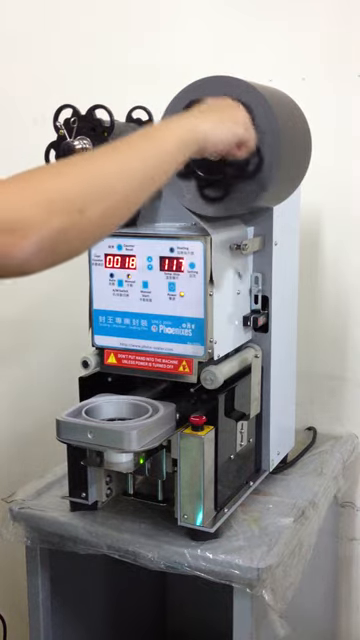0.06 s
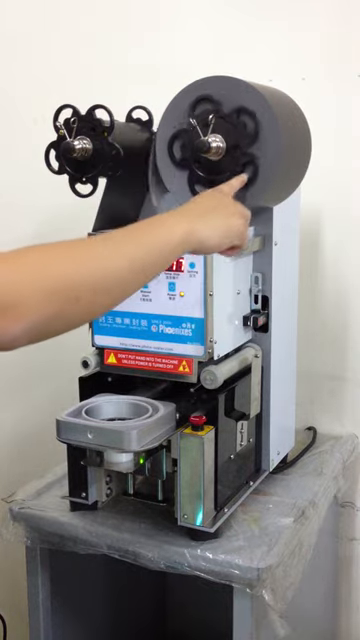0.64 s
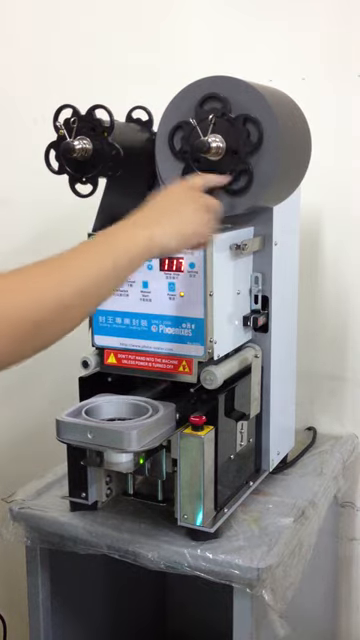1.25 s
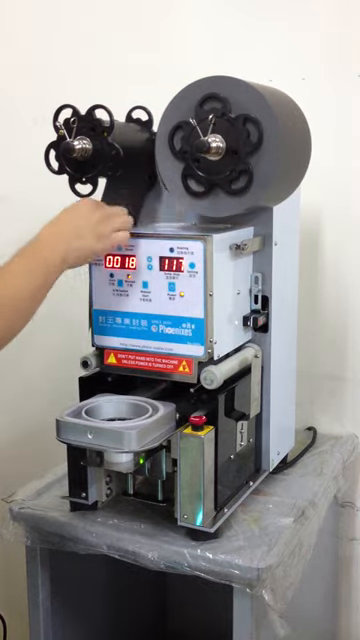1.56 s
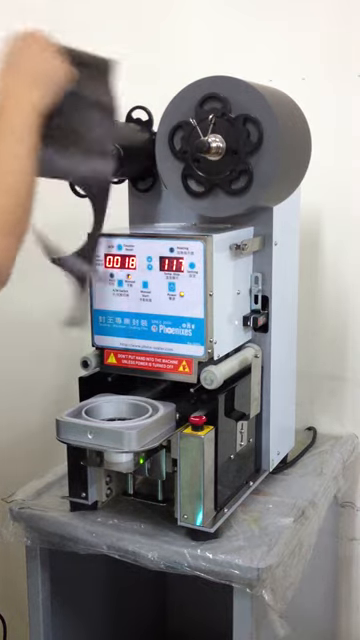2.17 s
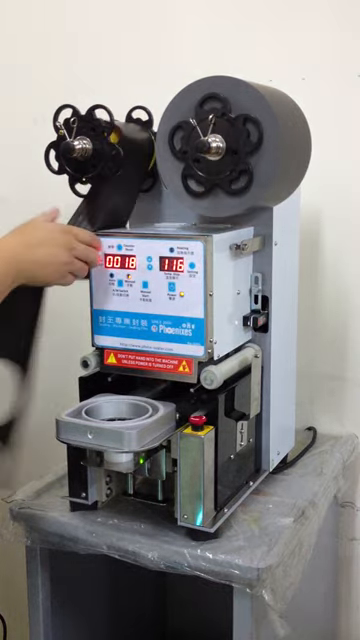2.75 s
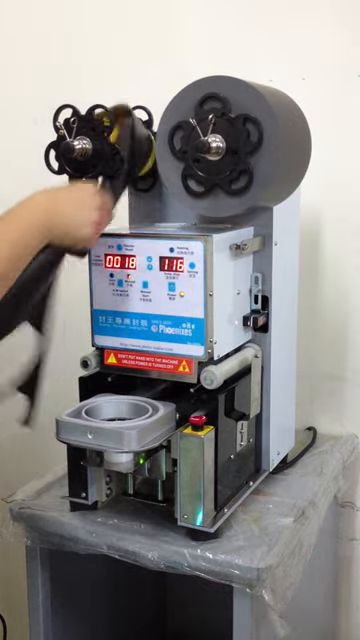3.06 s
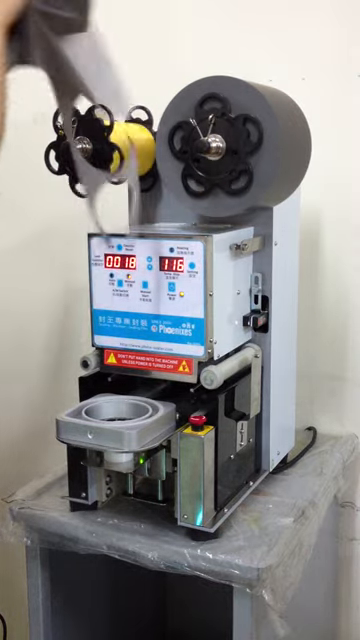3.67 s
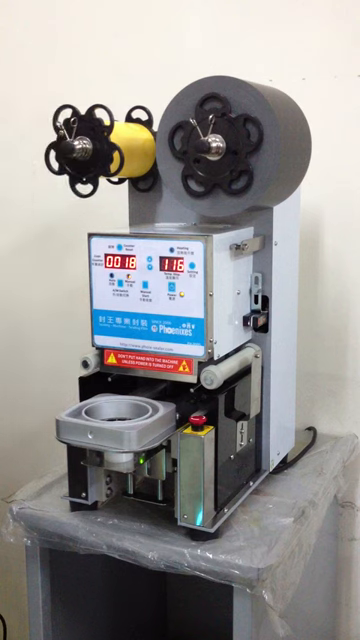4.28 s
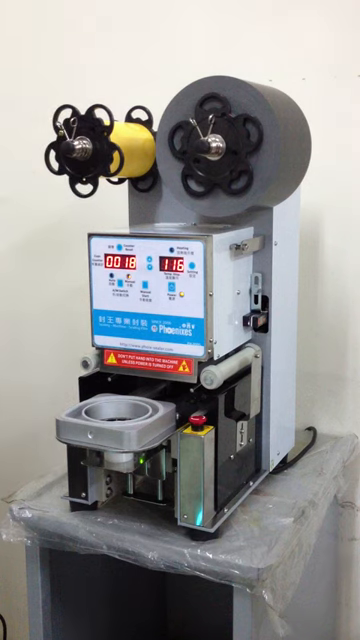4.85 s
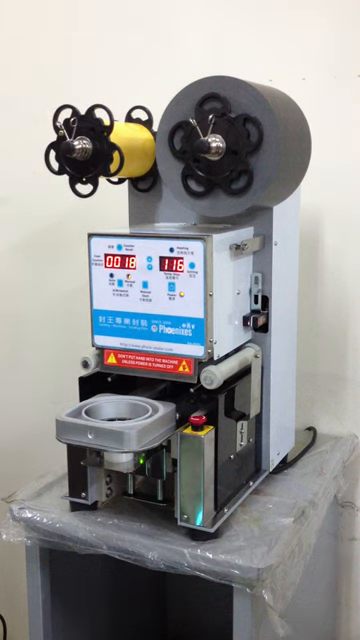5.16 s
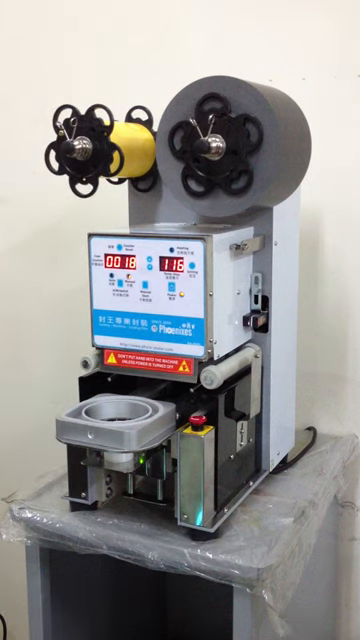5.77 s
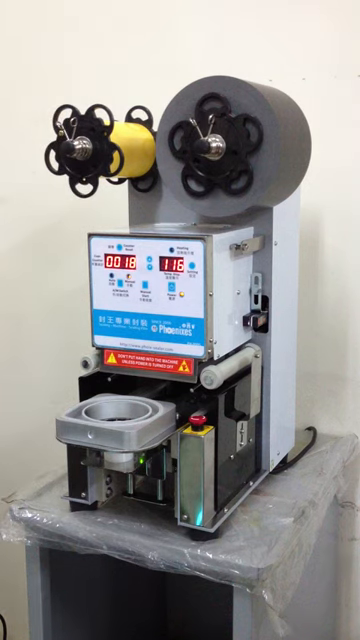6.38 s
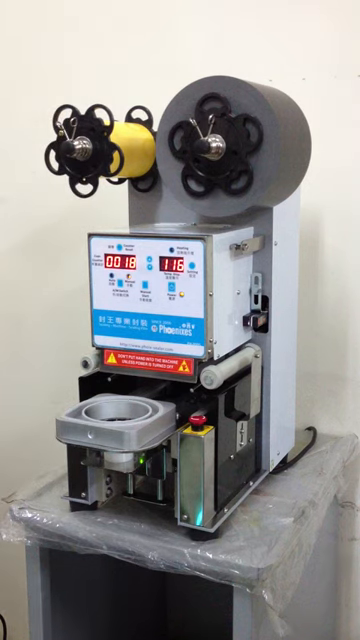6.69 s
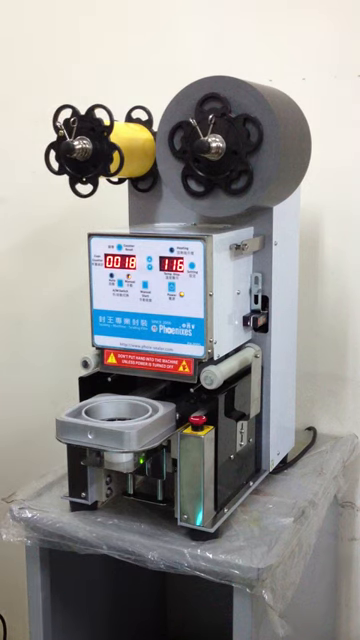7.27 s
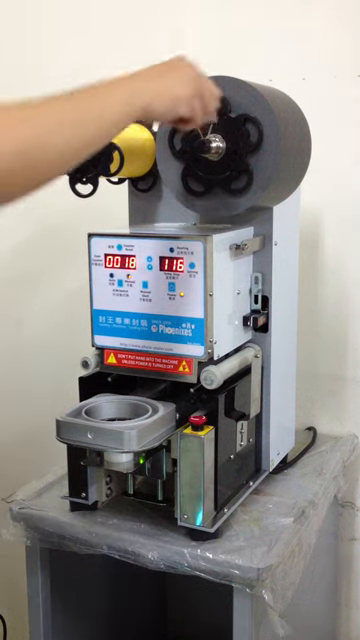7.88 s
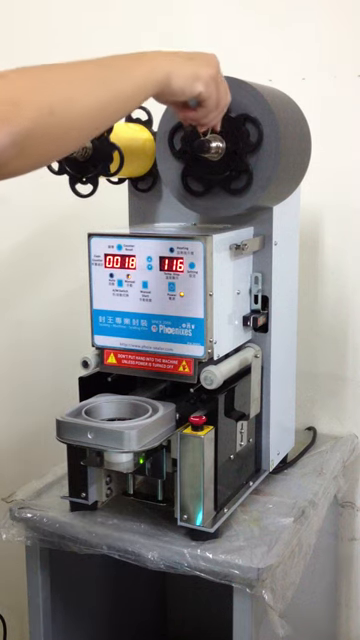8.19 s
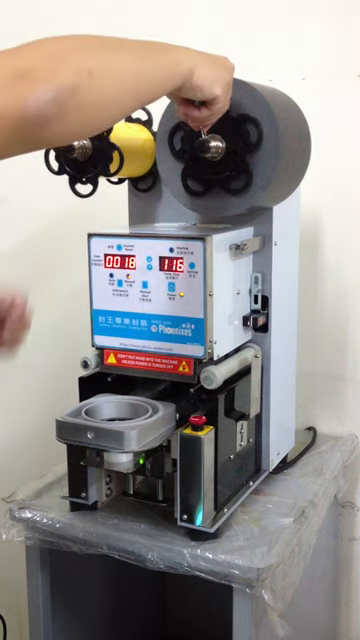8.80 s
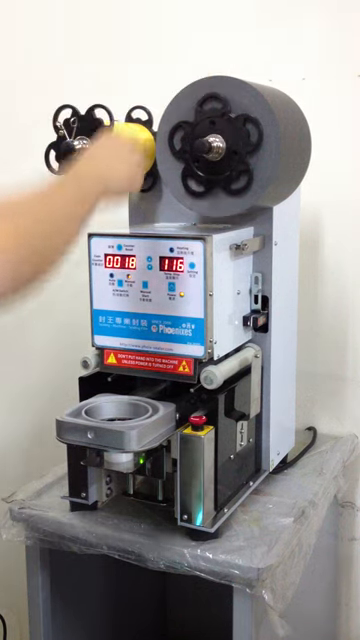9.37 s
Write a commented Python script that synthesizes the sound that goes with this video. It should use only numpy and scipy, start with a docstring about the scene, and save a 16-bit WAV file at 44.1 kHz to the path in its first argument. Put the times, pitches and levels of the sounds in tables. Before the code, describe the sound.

Over a faint machine hum, plastic film crinkles and pops as it leaves a reel, and later a spring clip clacks.

```python
"""A cup sealer in a small hard room, heard on one phone microphone in front of the humming machine.
First a hand drags the supply roll round to its stop, and the dry axle squeaks. From about 1.5 s waste
film is pulled off the take-up reel, which rumbles and groans. The film is crumpled by hand: its creases
rustle, pop and snap, and it bumps the housing. After 6 s the reel runs down and a thin whine comes up.
Near 9 s the spring clip on the axle ticks, then snaps home and sets the reel's flange ringing."""
import sys
import numpy as np
from scipy import signal
from scipy.fft import rfft, irfft
from scipy.io import wavfile
from scipy.ndimage import uniform_filter1d

SR = 44100
rng = np.random.default_rng(int(sys.argv[2]) if len(sys.argv) > 2 else 0)


def put_to_file(sound):
    """Save the sound as 16-bit audio at rate SR, in the file named by the first command-line argument."""
    columns = np.atleast_2d(sound).T  # one column per channel
    safe = np.clip(columns, -1, 1)
    whole_steps = np.round(safe * 32767)
    wavfile.write(sys.argv[1], SR, whole_steps.astype(np.int16))


N = 416304
TIME = np.arange(N) / SR
HIT_TIME = TIME[:SR * 3 // 5]  # 0.6 s for one blow or room tail
TOP_HZ = 15600
SOFT_CONTACT_S = 0.0061  # a soft blow lands gradually

# Spectra. Each row: frequency in Hz, relative level in dB.
AIR_COLOUR = [(18, -76), (30, -62), (65, -25), (125, -10), (332, -8.5), (389, -4.5), (455, -9.5),
              (639, -6.5), (852, -14.5), (945, -11), (1020, -17), (1720, -10.5), (1910, -11), (2240, -21.5),
              (5310, -23), (15500, -37)]  # room tone
REEL_COLOUR = [(29, -66), (50, -60), (130, -15.5), (157, -8.5), (225, -5.5), (299, -8), (337, -12),
               (418, 2), (876, -8.5), (1310, -5.5), (1550, -7.5), (4660, -11), (5250, -11.5), (12700, -38),
               (15000, -54)]  # hollow take-up reel
DRAG_COLOUR = [(59, -64), (100, -41), (300, -3), (500, -6), (660, -29), (760, -32), (1340, -30),
               (1520, -15), (2470, -11), (4660, -5.5), (5170, -1.5), (12800, -14.5), (15500, -28)]  # supply roll rubbing on its axle
TICK_COLOUR = [(1000, -32), (3000, -2), (4500, 5), (7500, 10.5), (10500, -6), (13000, -3), (15500, -24)]
CLACK_COLOUR = [(50, -61), (100, -41), (160, -16), (250, -25), (450, -1), (650, -6.5), (880, -10.5),
                (1100, -3.5), (1600, -4), (2080, 3), (2400, -7), (4600, -2), (5400, -9.5), (13400, -18.5),
                (15500, -51)]
STRIKE_COLOUR = [(300, -35), (1500, -4), (3000, 11), (4600, 3), (5600, 13), (6900, -11), (8200, 1),
                 (11000, -8), (15500, -13)]  # wire hitting the flange
BRUSH_COLOUR = [(500, -1), (2000, -4), (4500, 7), (8000, 1), (11000, -8), (15000, -18)]  # skin sliding on film
SLAP_COLOUR = [(80, -27), (200, -8.5), (480, -2.5), (800, -0.5), (1000, 2.5), (1350, 4), (1800, 4),
               (2300, -2.5), (3000, 1), (4600, -0.5), (7000, -10), (14000, -37)]  # papery slap of a bump
BOOM_COLOUR = [(70, -39), (140, -14), (220, 3.5), (330, -10), (450, -5), (650, 2.5), (900, -17),
               (2500, -42)]  # hollow body under a bump
RUSTLE_COLOUR = [(60, -42), (130, -12), (200, -5), (330, -4), (600, 10), (860, 2), (1100, 1), (1370, 4.5),
                 (2100, 4), (2800, 5), (3500, 3), (4600, 5), (6500, -2.5), (9000, -7), (15000, -39)]  # broad creases
FIZZ_COLOUR = [(2000, -23.5), (4000, -27), (6000, 12.5), (8200, 6), (10500, -0.5), (13000, -5),
               (15500, -23.5)]  # fine creases
MICROPHONE = [(40, -10), (90, -0.5), (700, -0.5), (870, -2), (1020, 1.5), (1300, 2), (1700, -2.5),
              (4000, -2.5), (4750, -2.5), (5150, -9.5), (6300, -3.5), (11000, 0), (13500, 7)]  # the phone's response
# Reverberation of the bare room. Each row: frequency in Hz, t60 in seconds.
ROOM_T60 = [(150, 0.71), (1000, 0.61), (4000, 0.56), (14000, 0.34)]
# Levels through the scene. Each row: time in seconds, relative level in dB.
HUM_LEVEL = [(0, -73), (.8, -78.5), (1.1, -70), (1.55, -74), (2.0, -66.5), (2.5, -60.5), (2.75, -75),
             (5.6, -79), (6.5, -75.5), (7.6, -80), (8, -84)]  # the hum's strong second harmonic
WHINE_LEVEL = [(0, -110), (6.6, -72.5), (7.6, -69), (9.44, -72.5)]
RUMBLE_LEVEL = [(0, -58.5), (1.6, -56.5), (2.3, -46), (2.95, -39.5), (3.7, -45.5), (4.9, -48.5),
                (5.4, -53.5), (6.4, -56.5), (8.6, -64), (9.44, -66)]  # the reel speeds up under the pull, then runs down
# Resonances driven by rubbing. Each row: frequency in Hz, width in Hz, relative level in dB.
REEL_MODES = [(312, 14, -6), (375.6, 7.5, -2.5), (420, 13, -6), (468.6, 3.1, -3.5), (506, 22, -5),
              (539, 8.4, -3), (576.6, 17, -1), (639, 12, -3.5)]  # flange of the turning reel
CORE_MODES = [(273, 6.4, -5), (318, 9.1, -5), (360, 13, -5), (404, 11, -4), (452, 11, -2), (508, 20, -2),
              (612, 12, -9), (667, 4.5, -9)]  # core of the supply roll
# Resonances rung by a blow. Each row: frequency in Hz, relative level in dB, t60 in seconds.
WIRE_MODES = [(4330, -11, 0.22), (5800, -6, 0.16), (6352, -15, 0.18), (7200, -16, 0.3), (7680, -3, 0.32),
              (7960, -8, 0.4), (8900, -8, .2), (11000, -6, .12)]  # steel clip
FLANGE_MODES = [(599, 4, 0.11), (1179, -6, 0.37), (1480, -9, 0.36), (1900, -5, 0.36), (2090, 1, 0.25),
                (2697, -1, 0.23), (2810, -6, 0.22), (3440, -8, 0.24), (3800, -16, 0.36), (4440, -8, 0.34),
                (4716, -5, 0.3), (5700, -6, 0.29)]  # reel flange
# Tones from the axle. Each row: start and length in seconds, pitch in Hz, relative level in dB.
GROANS = [(-.06, 0.23, 443, -52.5), (1.757, 0.37, 656, -63), (1.822, 1, 412.6, -62),
          (2.617, 0.6, 372.2, -55.5), (2.78, 0.094, 507, -53), (2.8, 0.32, 424, -58),
          (3.03, 0.075, 465, -52.5), (3.1, 0.45, 667.5, -55)]
SQUEAKS = [(1.18, 0.19, 6290, -61), (1.387, 0.07, 6230, -68), (1.485, .16, 8500, -78)]
# Moves of the spring clip. Each row: start in seconds, relative levels of wire and of reel in dB.
CLIP_HITS = [(8.869, -50, -65), (9.074, -44.5, -34.5)]
# Light touches on the film. Each row: start, rise and fall in seconds, level in dB.
BRUSHES = [(.4, 0.027, 0.15, -61), (.665, 0.017, 0.18, -59.5), (6.866, .005, 0.063, -59),
           (6.89, 0.031, 0.19, -57), (7.17, 0.021, 0.17, -65), (7.38, 0.021, 0.098, -64.5),
           (7.76, 0.032, 0.061, -66), (8.04, 0.076, 0.11, -56)]
# Film and hand bump the reel and housing. Each row: start in seconds, relative level in dB,
# boom and flange ring in dB against the slap, t60 of slap and boom in seconds.
BUMPS = [(0.242, -43.5, -3.5, -15, 0.11), (2.05, -38.5, -5.5, -13, 0.092), (3.236, -30, -7.5, -12, 0.082),
         (4.05, -35, -22, -20, 0.12), (4.384, -35.5, -3, -20, 0.042), (4.864, -30, -28, -14, 0.043),
         (5.987, -44, -2, -18, 0.059), (6.107, -32, -18, -27, 0.17)]
# Short hollow taps: film pops and the hollow ring of knocks.
# Each row: start in seconds, level in dB, lowest mode in Hz, flutter t60 in seconds.
HOLLOW_TAPS = [(1.765, -46, 1090, 0.039), (2.472, -45, 1200, .04), (2.834, -37, 1010, .03),
               (3.008, -39, 1260, 0.034), (3.076, -36, 1190, .025), (3.134, -35, 1350, 0.053),
               (3.254, -32, 1370, 0.066), (3.603, -40, 1200, 0.041), (4.057, -38, 676, 0.16),
               (4.39, -33.5, 1140, 0.029), (4.575, -36.5, 1160, 0.032), (5.126, -29, 1270, 0.0062),
               (5.137, -31.5, 1430, 0.032), (5.3465, -35, 1190, 0.03), (5.987, -49, 1050, .04),
               (6.108, -39.5, 710, 0.06), (6.127, -38, 1280, .08)]
# Modes of a hollow tap. Each row: multiple of the lowest mode, relative level in dB.
TAP_MODES = [(1, 4), (1.27, 0.5), (1.41, 6), (1.85, -7), (2.34, -8)]
# Sharp clicks: the roll's stop, then snapping film creases.
# Each row: start in seconds, relative level in dB, centre in Hz, flutter t60 in seconds.
SHARP_CLICKS = [(0.244, -42.5, 5200, 0.0052), (1.766, -45, 3600, 0.024), (2.054, -55, 3550, .04),
                (2.096, -45.5, 2980, .04), (2.236, -50, 3400, .015), (2.338, -47, 2930, .02),
                (2.479, -45, 2600, 0.023), (2.694, -44, 3350, 0.011), (2.834, -30, 4250, 0.01),
                (2.882, -33.5, 4080, 0.029), (2.953, -38, 7900, 0.016), (3.01, -34, 2700, .026),
                (3.035, -34, 4100, 0.017), (3.134, -29.5, 3960, 0.015), (3.242, -32, 4560, .06),
                (3.254, -31, 3900, 0.035), (3.381, -33.5, 4620, 0.016), (3.889, -37.5, 4380, 0.018),
                (3.929, -46, 7900, .012), (3.947, -49, 7450, .01), (3.999, -38.5, 3000, 0.051),
                (4.238, -44, 3000, 0.052), (4.389, -35, 4370, 0.022), (4.42, -38, 3670, 0.012),
                (4.474, -38, 4200, .015), (4.497, -43, 7000, 0.0088), (4.509, -33, 4700, 0.013),
                (4.526, -32.5, 3420, 0.017), (4.611, -37.5, 3430, 0.0073), (4.663, -34.5, 4770, 0.015),
                (4.707, -34, 6000, 0.0057), (4.754, -28.5, 5200, 0.024), (4.791, -36, 3800, 0.0072),
                (4.799, -38, 4000, 0.014), (4.8297, -32, 2820, .005), (4.833, -33, 2700, 0.003),
                (4.862, -25.5, 3170, 0.008), (4.875, -37, 2300, 0.04), (4.925, -32.5, 4450, 0.0092),
                (4.995, -34.5, 6600, 0.018), (5.007, -36, 6000, .01), (5.051, -30, 5500, 0.0025),
                (5.056, -36, 3150, 0.0054), (5.064, -37, 9900, 0.0044), (5.079, -41, 5500, 0.0088),
                (5.126, -32, 2970, .005), (5.178, -32.5, 4300, 0.005), (5.2074, -31, 4960, 0.0049),
                (5.26, -45, 8000, .005), (5.346, -41.5, 3000, 0.0045), (5.53, -42.5, 4300, 0.06),
                (5.986, -49, 4500, 0.017), (5.999, -47, 2770, 0.05), (6.872, -51.5, 3200, 0.011)]
# Pulls and squeezes. Each row: start and length in seconds, relative levels of rustle and fizz in dB.
GRIPS = [(1.715, 0.041, -51, -51.5), (1.83, 0.2, -55, -56.5), (2.195, 0.043, -49.5, -62),
         (2.325, 0.067, -55, -73), (2.46, 0.073, -48, -62), (2.687, 0.12, -56, -59),
         (2.82, 0.032, -42.5, -38), (2.937, 0.02, -39, -38.5), (2.999, 0.087, -40, -44),
         (3.126, 0.02, -38, -40.5), (3.223, 0.016, -37, -40), (3.361, 0.016, -36, -41.5),
         (3.47, 0.022, -42, -44), (3.61, 0.034, -42.5, -59), (3.911, 0.033, -41.5, -43),
         (3.998, 0.23, -48.5, -57), (4.224, 0.051, -40, -40.5), (4.33, 0.072, -38.5, -44.5),
         (4.48, 0.21, -39, -40), (4.76, 0.086, -35, -37), (4.853, 0.013, -40, -34),
         (4.938, 0.065, -37, -42.5), (4.984, 0.13, -39.5, -41.5), (5.165, 0.11, -46.5, -49.5),
         (5.37, 0.13, -48.5, -52), (5.508, 0.11, -50, -56), (5.672, 0.022, -43.5, -47),
         (5.703, 0.031, -40, -44), (6.082, 0.073, -47, -49)]


def undb(db):
    """Decibels to gain."""
    return np.exp(np.asarray(db) * np.log(10) / 20)


def unit(x):
    """Scale to rms 1."""
    return x / np.sqrt(np.mean(x ** 2) + 1e-30)


def unit_peak(x):
    """Scale so that the loudest 4 ms have rms 1."""
    return x / np.sqrt(uniform_filter1d(x ** 2, size=176, mode="constant").max())


def curve(points):
    """Join (seconds, value) points sample by sample."""
    return np.interp(TIME, *np.transpose(points))


def on_log_axis(hz, points):
    """Read (Hz, value) points at the given frequencies."""
    centres, values = np.transpose(points)
    return np.interp(np.log(np.maximum(hz, 1)), np.log(centres), values)


def colour(x, spectrum, size=4096):
    """Minimum-phase filter with the given (Hz, dB) shape."""
    gain = undb(on_log_axis(np.fft.rfftfreq(size, 1 / SR), spectrum))
    cepstrum = irfft(np.log(gain))
    cepstrum[1:size // 2] *= 2
    cepstrum[size // 2 + 1:] = 0
    return signal.oaconvolve(x, irfft(np.exp(rfft(cepstrum))))[:len(x)]


def resonance(x, hz, width_hz):
    """Two-pole band-pass with gain 1 at its centre."""
    g, k = np.tan(np.pi * min(hz, TOP_HZ) / SR), width_hz / hz
    return signal.lfilter([g * k, 0, -g * k], [1 + g * k + g * g, 2 * g * g - 2, 1 - g * k + g * g], x)


def resonate(drive, modes):
    """Forced vibration of (Hz, width in Hz, dB) modes."""
    return sum(undb(db) * unit(resonance(drive, hz, width)) for hz, width, db in modes)


def walk(rate_hz):
    """Smooth random wander with rms 1."""
    step = int(SR / rate_hz)
    stairs = np.repeat(rng.standard_normal(N // step + 1), step)
    return unit(uniform_filter1d(stairs, step)[:N])


def swell(start, rise, fall):
    """A straight rise to 1 and a straight fall."""
    return np.interp(TIME, [start, start + rise, start + rise + fall], [0, 1, 0])


def stroke(start, length, attack_s, release_t60):
    """Straight attack, hold, exponential release."""
    attack = np.clip((TIME - start) / attack_s, 0, 1)
    return attack * np.exp(-np.log(1000) * np.clip((TIME - start - length) / release_t60, 0, 10))


def landing():
    """The build-up of a soft blow."""
    return np.minimum(HIT_TIME / SOFT_CONTACT_S, 1)


def fade(t60):
    """Exponential decay, 60 dB in t60 seconds."""
    return np.exp(-np.log(1000) * HIT_TIME / t60) + 1e-12


def burst(t60):
    """The dense, dying ring of a struck thing."""
    return rng.standard_normal(len(HIT_TIME)) * fade(t60)


def ring(modes):
    """Free vibration of (Hz, dB, t60) modes, each kicked one way or the other."""
    return sum(undb(db) * fade(t60) * np.cos(2 * np.pi * hz * HIT_TIME) * rng.choice([-1, 1])
               for hz, db, t60 in modes)


def crackle(per_s, spread_db, limit_db):
    """Random tiny clicks, most faint and a few strong."""
    chance = rng.random(N)
    at = np.flatnonzero(chance < per_s / SR)
    rarity = -np.log(chance[at] * SR / per_s)
    clicks = np.full(N, 1e-12)
    clicks[at] = (-1) ** (at % 2) * undb(np.minimum(spread_db * rarity, limit_db))
    return clicks


def add(track, start, sound):
    """Mix a sound into a track, start seconds in."""
    i = max(int(start * SR), 0)
    track[i:i + len(sound)] += sound[:N - i]


def room(x, wet_db, gap_s=0.0018):
    """The direct sound reaches the microphone first, then dense reflections off close bare walls."""
    hz = np.fft.rfftfreq(len(HIT_TIME), 1 / SR)
    noise = rfft(rng.standard_normal(len(HIT_TIME)))
    centres, t60s = np.transpose(ROOM_T60)
    bands = [irfft(noise * on_log_axis(hz, np.c_[centres, share])) for share in np.eye(len(centres))]
    tail = sum(band * fade(t60) for band, t60 in zip(bands, t60s)) * (HIT_TIME > gap_s)
    response = undb(wet_db) * tail / np.linalg.norm(tail)
    response[0] = 1
    return signal.oaconvolve(x, response / np.linalg.norm(response))[:N]


def room_tone(level_db=-65.5):
    """Steady air noise all round the microphone."""
    return unit(colour(rng.standard_normal(N), AIR_COLOUR)) * undb(level_db)


def machine(start_hz=77.4, settled_hz=86, settle_s=2.2, fundamental_db=-14.5, waver_db=1.5):
    """The sealer's low, wavering hum creeps up in pitch; a thin whine joins it late."""
    hz = settled_hz + (start_hz - settled_hz) * np.exp(-TIME / settle_s)
    phase = 2 * np.pi * np.cumsum(hz * (1 + 0.019 * walk(25))) / SR
    harmonics = undb(fundamental_db) * np.sin(phase) + np.sin(2 * phase)
    whine = unit(resonance(rng.standard_normal(N), hz=1908, width_hz=44)) * undb(curve(WHINE_LEVEL))
    hum = np.sqrt(2) * harmonics * undb(curve(HUM_LEVEL) + waver_db * walk(12))
    return hum + whine


def drone(peak_s=5.7, rise_s=1.06, fall_s=0.15, hz_at_peak=143, glide_hz_per_s=8.5, level_db=-66.5):
    """A soft low tone swells once while its pitch rises a little."""
    hz = hz_at_peak + glide_hz_per_s * (TIME - peak_s)
    gain = swell(peak_s - rise_s, rise_s, fall_s) * undb(level_db + 2.5 * walk(14))
    return gain * np.sqrt(2) * np.sin(2 * np.pi * np.cumsum(hz) / SR)


def reel(gain_db=-2.5, uneven_db=1, pull_start_s=1.5, pull_end_s=3.4, ease_s=0.96):
    """The hollow plastic reel rumbles unevenly on its axle; its flange sings more under the pull."""
    pull_times = [pull_start_s - ease_s, pull_start_s, pull_end_s, pull_end_s + ease_s]
    flange_db = np.interp(TIME, pull_times, [-10, -5, -5, -10])
    flange = undb(flange_db) * unit(resonate(rng.standard_normal(N), REEL_MODES))
    rumble = unit(colour(rng.standard_normal(N), REEL_COLOUR))
    return (rumble + flange) * undb(curve(RUMBLE_LEVEL) + gain_db + uneven_db * walk(14))


def groans(gain_db=1, waver=0.00707, rough_db=3):
    """The turning reel chatters on its axle at its resonances: nearly pure, slightly unsteady tones."""
    out = np.zeros(N)
    for start, length, hz, db in GROANS:
        phase = 2 * np.pi * np.cumsum(hz * (1 + waver * walk(30.24))) / SR
        tone = np.sqrt(2) * np.sin(phase) * undb(db + gain_db + rough_db * walk(24.8))
        out += tone * stroke(start, length, attack_s=0.053, release_t60=0.45)
    return out


def supply_roll(hiss_db=-47.5, groan_db=-53.5, drag_s=0.26, knock_s=0.255, knock_db=-41, knock_t60=0.11):
    """The full roll slips round its axle: friction hisses, the core groans, then knocks at the stop."""
    slips = rng.standard_normal(N)
    groan = undb(groan_db) * unit(resonate(slips, CORE_MODES))
    hiss = undb(hiss_db) * unit(colour(slips, DRAG_COLOUR))
    out = (hiss + groan) * stroke(0, drag_s, attack_s=1 / SR, release_t60=0.11)
    knock = landing() * ring([(hz, db, knock_t60) for hz, _, db in CORE_MODES])
    add(out, knock_s, undb(knock_db) * unit_peak(knock))
    return room(out, wet_db=-10.5)


def squeaks(waver=0.003, octave_db=-28, rough_db=5, pitch_arch=0.0072):
    """The dry axle sings a thin, wavering note with a faint octave, a little higher when pressed."""
    out = np.zeros(N)
    bend = 1 + waver * walk(300)
    roughness = undb(rough_db * walk(90))
    for start, length, hz, db in SQUEAKS:
        pressure = np.interp((TIME - start) / length, [0, .2, .6, 1], [0, 1, 1, 0])
        phase = 2 * np.pi * np.cumsum(hz * bend * (1 + pitch_arch * (pressure - 1))) / SR
        out += undb(db) * pressure * (np.sin(phase) + undb(octave_db) * np.sin(2 * phase))
    return room(out * roughness, wet_db=-5)


def spring_clip(strike_db=-3, rebound_s=0.007, rebound_db=-1):
    """The steel wire ticks and rings; it strikes the reel's flange, rebounds and sets it ringing."""
    out = np.zeros(N)
    for start, wire_db, reel_db in CLIP_HITS:
        wire = undb(-6) * unit_peak(ring(WIRE_MODES))
        tick = undb(2) * unit_peak(colour(burst(t60=0.15), TICK_COLOUR))
        clack = undb(-1) * unit_peak(colour(burst(t60=0.27), CLACK_COLOUR))
        flange = undb(-8) * unit_peak(ring(FLANGE_MODES))
        boom = undb(-15) * unit_peak(colour(landing() * burst(t60=0.67), REEL_COLOUR))
        add(out, start, undb(wire_db) * (wire + tick) + undb(reel_db) * (clack + flange + boom))
        for bounce in range(3):
            strike = unit_peak(colour(burst(t60=0.0099), STRIKE_COLOUR))
            gain = undb(reel_db + strike_db + bounce * rebound_db)
            add(out, start + bounce * rebound_s, gain * strike)
    return room(out, wet_db=-5.5)


def brushes():
    """Skin and film brush lightly: short hisses that swell and die away."""
    pressure = sum(undb(db) * swell(start, rise, fall) for start, rise, fall, db in BRUSHES)
    hiss = unit(colour(rng.standard_normal(N), BRUSH_COLOUR))
    return room(pressure * hiss, wet_db=-8)


def bumps(gain_db=-1):
    """Soft blows: a short papery slap over the boom of the hollow body and the ring of the flange."""
    out = np.zeros(N)
    for start, db, boom_db, flange_db, t60 in BUMPS:
        slap = unit_peak(colour(landing() * burst(t60), SLAP_COLOUR))
        boom = undb(boom_db) * unit_peak(colour(landing() * burst(t60), BOOM_COLOUR))
        flange = undb(flange_db) * unit_peak(landing() * ring(FLANGE_MODES))
        add(out, start, undb(db + gain_db) * unit_peak(slap + boom + flange))
    return room(out, wet_db=-0.5)


def hollow_taps(relative_width=0.13):
    """Film pops and the hollow ring of knocks: a push and a short flutter drive a few broad modes."""
    out = np.zeros(N)
    for start, db, hz, flutter_t60 in HOLLOW_TAPS:
        push = burst(flutter_t60)
        push[0] += 1
        modes = [(hz * ratio, relative_width * hz * ratio, mode_db) for ratio, mode_db in TAP_MODES]
        tap = resonance(resonate(push, modes), hz, 2 * hz)  # thins the bass and the top
        add(out, start, undb(db) * unit_peak(tap))
    return room(out, wet_db=-5)


def sharp_clicks(gain_db=1, flutter_db=-4, crack_width=1.25, ring_db=-7, ring_width=0.24):
    """The roll's stop, then snapping film creases: one push and a brief flutter crack and ring."""
    out = np.zeros(N)
    after_gap = HIT_TIME > 0.003
    for start, db, hz, flutter_t60 in SHARP_CLICKS:
        push = undb(flutter_db) * burst(flutter_t60)
        push[0] += 1
        # the hands keep moving, so every click has its own reflections
        near_corner = undb(-3.5) * unit(burst(t60=0.16) * after_gap)
        far_walls = undb(-2.5) * unit(burst(t60=0.48) * after_gap)
        click = unit(push) + near_corner + far_walls
        crack = unit(resonance(resonance(click, hz, crack_width * hz), hz, crack_width * hz))
        ringing = undb(ring_db) * unit(resonance(click, hz, ring_width * hz))
        add(out, start, undb(db + gain_db) * unit_peak(crack + ringing))
    return out


def buckling_power(decay_s=0.0078, steady_share=0.71):
    """One crease sets off its neighbours: sudden, fast-dying runs of power over a steady floor."""
    kicks = crackle(per_s=57, spread_db=7.5, limit_db=16) ** 2
    runs = signal.lfilter([1], [1, -np.exp(-1 / (decay_s * SR))], kicks)
    return steady_share + (1 - steady_share) * runs / runs.mean()


def creases(sharp_db=-4):
    """Creases of six sizes buckle independently, each size at its own pitch, among sharp clicks."""
    pitched = sum(resonance(crackle(per_s=350, spread_db=3.5, limit_db=14), hz, hz / 2)
                  for hz in np.geomspace(1100, 13000, num=6))
    sharp = crackle(per_s=900, spread_db=1.5, limit_db=2.5)
    return unit(pitched) + undb(sharp_db) * unit(sharp)


def crumpling(gain_db=-3, shared_runs=0.41):
    """Countless small creases buckle in runs under two hands; broad ones rustle, fine ones fizz."""
    broad, fine, out = np.zeros((3, N))
    for start, length, rustle_db, fizz_db in GRIPS:
        grip = stroke(start, length, attack_s=0.016, release_t60=0.41)  # creases build up, then settle
        broad = np.maximum(broad, undb(rustle_db + gain_db) * grip)
        fine = np.maximum(fine, undb(fizz_db + gain_db) * grip)
    broad_power = buckling_power()
    fine_power = shared_runs * broad_power + (1 - shared_runs) * buckling_power()
    for hand in range(2):
        grains = creases()
        rustle = broad * np.sqrt(broad_power) * unit(colour(grains, RUSTLE_COLOUR))
        fizz = fine * np.sqrt(fine_power) * unit(colour(grains, FIZZ_COLOUR))
        out += room(rustle + fizz, wet_db=-2)
    return out


def scene():
    """All sources in mono, heard from one point in front of the machine."""
    background = room_tone() + machine() + drone()
    mechanism = reel() + groans() + supply_roll() + squeaks() + spring_clip()
    handling = brushes() + bumps() + hollow_taps() + sharp_clicks() + crumpling()
    return (background + mechanism + handling)[None]


def record(dry):
    """The phone's microphone colours the sound, and the top treble is cut."""
    lowpass = signal.ellip(10, .2, 70, TOP_HZ, fs=SR, output="sos")
    return signal.sosfilt(lowpass, colour(dry[0], MICROPHONE))[None]


dry = scene()
out = record(dry)
put_to_file(out)
```